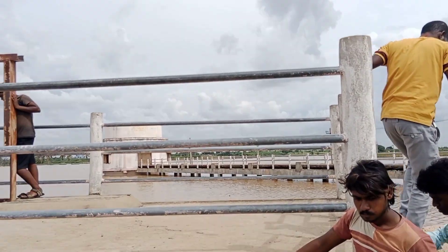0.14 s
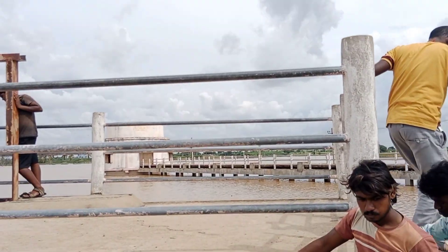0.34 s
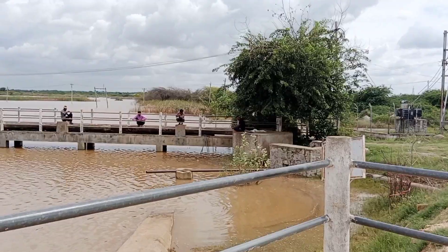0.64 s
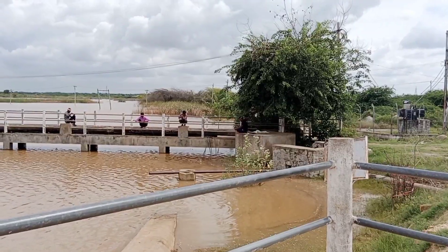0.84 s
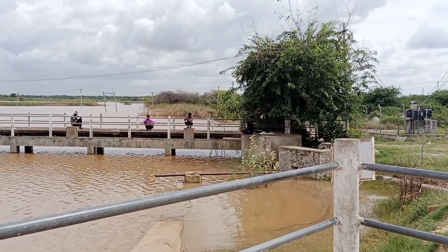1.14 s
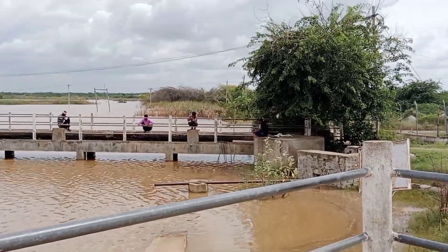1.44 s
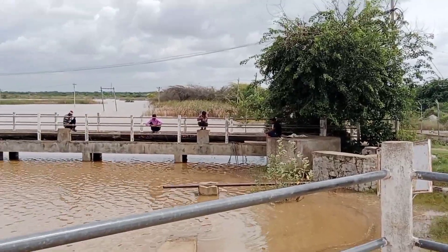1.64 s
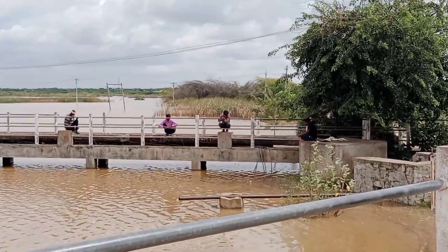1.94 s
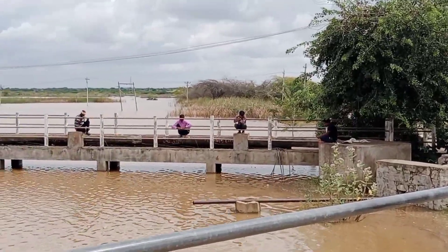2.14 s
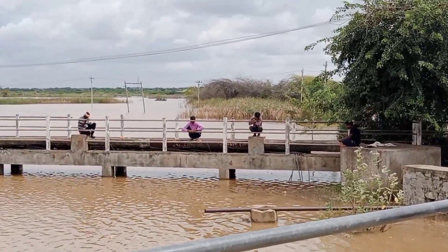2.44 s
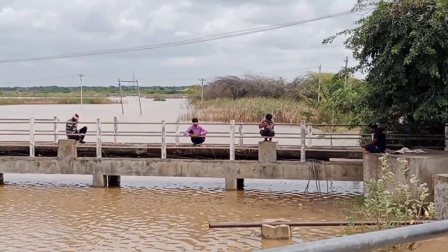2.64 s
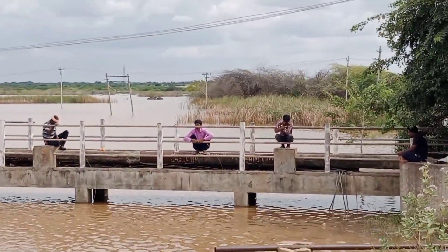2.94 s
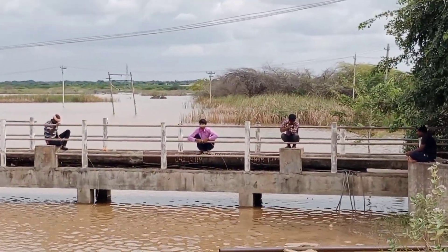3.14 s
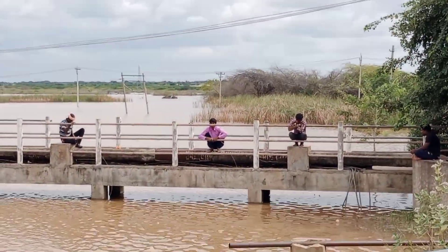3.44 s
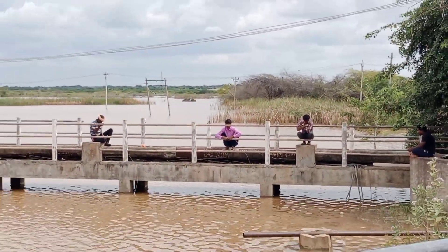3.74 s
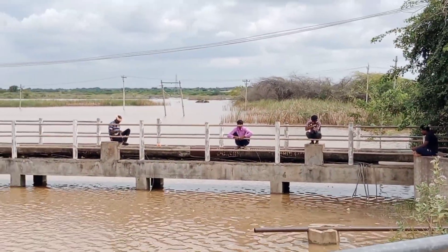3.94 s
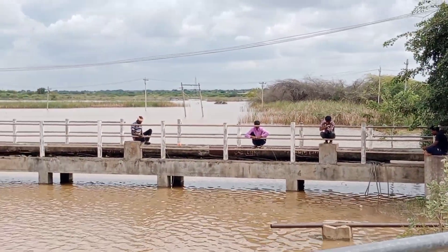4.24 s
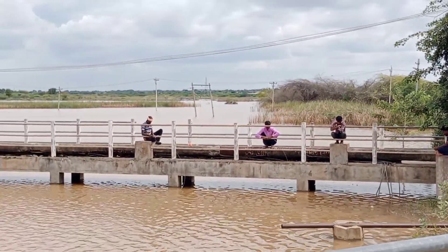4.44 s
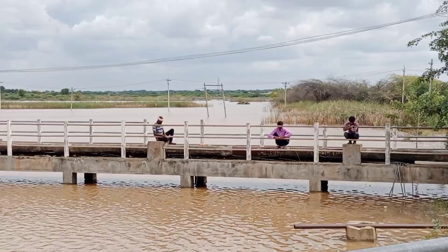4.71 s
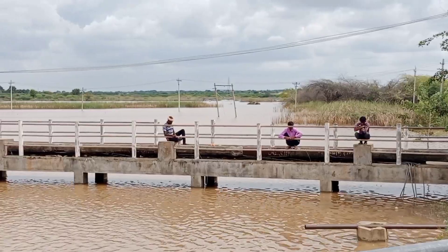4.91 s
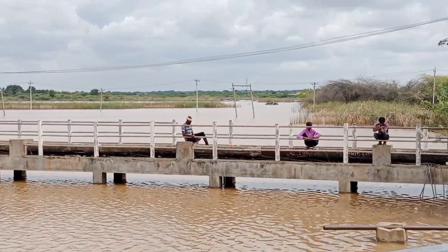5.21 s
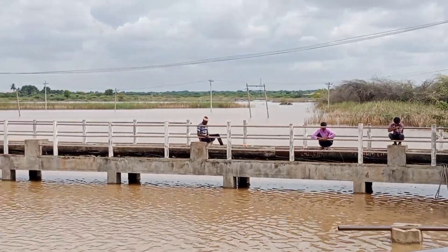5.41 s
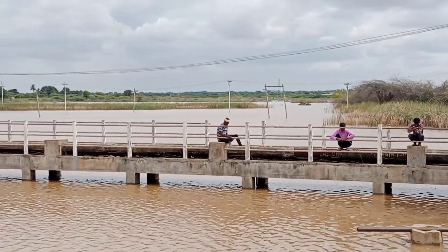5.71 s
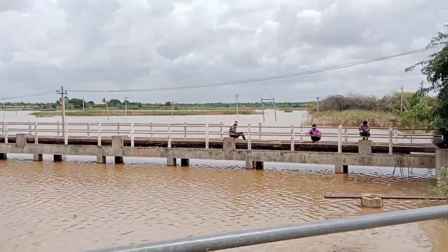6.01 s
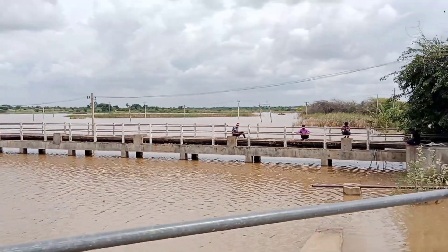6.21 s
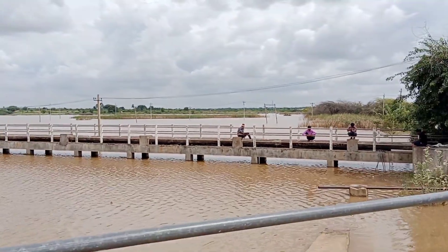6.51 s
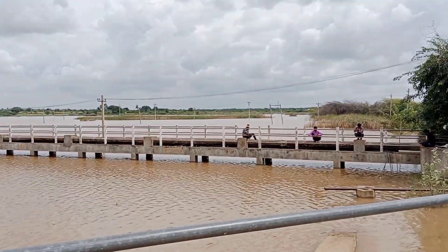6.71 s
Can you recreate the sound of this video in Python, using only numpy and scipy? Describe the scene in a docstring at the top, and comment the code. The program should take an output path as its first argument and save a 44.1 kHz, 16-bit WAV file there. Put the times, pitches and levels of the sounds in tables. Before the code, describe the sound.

A brief burst of close, bright falling water stops dead, and a more distant rush of water through sluices fades in.

```python
"""Floodwater pours through the sluices of a concrete causeway, heard by a phone outdoors.
First the falling water is near, loud and bright: broadband noise dotted with bursting bubbles.
At 0.39 s it is cut dead. After a brief silence a farther spot fades in: a low roar in the culverts,
where trapped air pockets ring, with a rumble, the rush of the stream and a thin hiss of spray.
To the end the flow swells and eases, and the mist and the hollow wash under the deck vary most with it."""
import sys
import numpy as np
from scipy import signal
from scipy.fft import rfft, irfft, next_fast_len
from scipy.io import wavfile
from scipy.ndimage import uniform_filter1d, map_coordinates

SR = 44100
rng = np.random.default_rng(int(sys.argv[2]) if len(sys.argv) > 2 else 0)


def generate_wav(sig):
    """Save sig (samples, or channels by samples) to the path in sys.argv[1] as 16-bit PCM at SR."""
    pcm = np.round(np.clip(np.atleast_2d(sig).T, -1, 1) * 32767).astype(np.int16)
    wavfile.write(sys.argv[1], SR, pcm)


N = 302526

# Noise spectrum of each source: frequency_hz, relative_density_db
MIST_SPECTRUM = [(8800, -11), (9300, 3), (15500, -5)]
HOLLOW_SPECTRUM = [(900, -15), (1250, 0), (1600, -1), (2100, -22)]
RUMBLE_SPECTRUM = [(12, -40), (25, -23), (40, -22), (58, -16), (83, -2.5), (120, 2), (170, -26.5)]
SPRAY_SPECTRUM = [(3500, -29), (5200, -1.5), (8800, 3), (9800, -6)]
ROAR_SPECTRUM = [(90, -32), (140, -1), (280, -0.5), (400, -2.5), (700, -26)]
RUSH_SPECTRUM = [(200, -17), (400, -1.5), (600, 0), (880, -3), (1300, -3.5), (2200, -7.5), (3200, -8.5),
                 (4500, -9), (6000, -34)]
FALL_SPECTRUM = [(12, -50), (25, -28), (48, -22), (80, -7.5), (170, 0), (450, 0.5), (950, -4), (2200, -2),
                 (3000, -6), (3500, -13.5), (4200, 9.5), (5400, 0), (7500, -1.5), (12500, 0), (15000, -4)]
# Slow envelopes of the far flow, the rumble and the near fall: time_s, level_db
FLOW_SWELL = [(.8, -1), (1.6, -0.4), (2.3, 0.64), (3.7, 0), (5, 0.73), (6.2, 1.36), (6.86, 0.5)]
RUMBLE_ENVELOPE = [(.8, -43), (1.2, -53), (1.6, -48), (1.9, -46), (2.4, -43.5), (2.7, -50), (3, -44.5),
                   (4.5, -46), (4.9, -44.5), (5.5, -41), (6.4, -47), (6.86, -46)]
FALL_ENVELOPE = [(0.0, -17), (0.312, -17.5), (0.368, -16), (0.39, -18)]
# Brief rises and dips in level: centre_s, change_db
MIST_GUSHES = [(1.26, 4), (4.4, 3)]
RUMBLE_THUMPS = [(1.78, 11), (1.9, 11), (4.83, 5), (5.41, 9), (6.81, 7)]
ROAR_LULLS = [(1.3, -4), (4.19, -7), (4.63, -4), (5.34, -6), (5.78, -4.5), (6.3, -5.5), (6.62, -6.5)]
# Response of the microphone's housing and port: frequency_hz, gain_db
HOUSING_RESPONSE = [(3200, 0.5), (3550, -6), (3980, -26), (4400, -34.5), (5300, -27.5), (5700, -20),
                    (6700, -8.5), (7500, -6), (8700, -14), (10000, -19), (12200, -19.5), (13100, -17),
                    (13700, -23), (15300, -19)]
# Cancellations in the port: centre_hz, width_hz, gain_db
PORT_NOTCHES = [(4840, 194, -23.5), (9320, 290, -12), (11400, 320, -6.5), (13900, 400, -2.5)]

CUT_S, FADE_IN_S = 0.3937, 0.4555
BAND_LIMIT_HZ = 15570


def amp(db):
    """Amplitude grows tenfold per 20 dB."""
    return 10 ** (np.asarray(db) / 20)


def rms(x):
    """Effective amplitude: the root of the mean power."""
    return np.sqrt(np.mean(x ** 2) + 1e-20)


def spectrum_db(points, hz):
    """Interpolation on a logarithmic frequency axis."""
    knots_hz, db = np.transpose(points)
    return np.interp(np.log(hz + 1), np.log(knots_hz + 1), db)


def envelope(points):
    """Linear interpolation of a level over time."""
    return np.interp(np.arange(N) / SR, *np.transpose(points))


def bumps(events, width_s):
    """Gaussian level changes in dB, down to 1/e at width_s from each centre."""
    return sum(db * np.exp(-((np.arange(N) / SR - s) / width_s) ** 2) for s, db in events)


def wobble(rate_hz):
    """Random modulation: a spline through rate_hz knots a second."""
    knots = rng.standard_normal(int(N * rate_hz / SR) + 4)
    return map_coordinates(knots, [np.arange(N) * rate_hz / SR])


def filtered(x, response):
    """Linear filtering multiplies the spectrum by a frequency response."""
    size = next_fast_len(N + 8192)
    return irfft(rfft(x, size) * response(np.fft.rfftfreq(size, 1 / SR)), size)[..., :N]


def microphone_gain(hz):
    """The housing colours the sound; destructive interference in the port notches it."""
    notches_db = sum(db * np.exp(-np.abs(hz - centre) / width) for centre, width, db in PORT_NOTCHES)
    return amp(spectrum_db(HOUSING_RESPONSE, hz) + notches_db)


def water_noise(spectrum, patchy_db, burst_db=-12, frame=512):
    """Patchy noise plus the shot noise of bursting bubbles, at unit rms after the microphone."""
    cells = signal.stft(rng.standard_normal(N), nperseg=frame)[2]
    patches = uniform_filter1d(rng.standard_normal(cells.shape), size=4, axis=0)
    patches = uniform_filter1d(patches, size=5, axis=1)
    noise = signal.istft(cells * amp(patchy_db * patches / rms(patches)), nperseg=frame)[1][:N]
    bursts = (rng.random(N) < 3000 / SR) * rng.standard_normal(N)  # about 3000 a second
    mix = noise / rms(noise) + amp(burst_db) * bursts / rms(bursts)
    water = filtered(mix, lambda hz: amp(spectrum_db(spectrum, hz)) * (hz > spectrum[0][0]))
    return water / rms(filtered(water, microphone_gain))


def mist(swell_db, surge):
    """Amplitude modulation makes the highest noise band flicker and flare."""
    level_db = -54 + 3 * swell_db + 0.4 * surge + bumps(MIST_GUSHES, 0.07) + 0.71 * wobble(18)
    return amp(level_db) * water_noise(MIST_SPECTRUM, patchy_db=2.5)


def hollow_wash(swell_db, surge):
    """The air under the deck acts as a band-pass filter on the water's noise."""
    level_db = -44.5 + 5.5 * swell_db + 0.4 * surge
    return amp(level_db) * water_noise(HOLLOW_SPECTRUM, patchy_db=1.5, frame=1024)


def rumble():
    """Low-frequency noise, whose brief envelope peaks are heard as thumps."""
    level_db = envelope(RUMBLE_ENVELOPE) + bumps(RUMBLE_THUMPS, 0.028) + 2.5 * wobble(14)
    return amp(level_db) * water_noise(RUMBLE_SPECTRUM, patchy_db=2, burst_db=-14, frame=2048)


def spray(swell_db, surge):
    """Spray radiates high-frequency noise, heard as a thin hiss."""
    return amp(-41.5 + 0.75 * swell_db + 0.3 * surge) * water_noise(SPRAY_SPECTRUM, patchy_db=1)


def air_pockets(count, median_hz, log_spread, cycles):
    """Air pockets swallowed by the flow ring as damped oscillators of rising pitch."""
    when, depth = np.hsplit(rng.random((count, 2)), 2)
    t = np.arange(4000) / SR
    pitch_hz = median_hz * np.exp(log_spread * rng.standard_normal((count, 1)))
    age = pitch_hz * t / cycles
    phase = 2 * np.pi * pitch_hz * t * (1 + 0.064 * age)
    rings = amp(-12 * depth) * age * np.exp(-2 * age) * np.sin(phase)
    samples = (when * N).astype(int) + np.arange(len(t))
    gulps = np.bincount(samples.ravel(), rings.ravel())[:N]
    return gulps / rms(gulps)


def culvert_roar(swell_db, surge):
    """Low noise and bubble resonances superpose in a roar with brief lulls."""
    churn = water_noise(ROAR_SPECTRUM, patchy_db=2.5, burst_db=-16.5, frame=2048)
    churn += amp(-8.5) * air_pockets(count=600, median_hz=281.3, log_spread=0.401, cycles=6.25)
    level_db = -33.5 + 0.2 * swell_db + 0.29 * surge + bumps(ROAR_LULLS, 0.042) + 1.6 * wobble(25)
    return amp(level_db) * churn / rms(churn)


def stream_rush(swell_db, surge):
    """The stream radiates broad midrange noise that grows with the flow."""
    level_db = -29.5 + 0.64 * swell_db + 0.32 * surge
    return amp(level_db) * water_noise(RUSH_SPECTRUM, patchy_db=1.23, frame=1024)


def far_sluices(fade):
    """Common modulation: all but the rumble swell and surge together. The treble fades in last."""
    flow = envelope(FLOW_SWELL), wobble(12)
    bass = fade ** 1.13 * (rumble() + culvert_roar(*flow))
    midrange = fade ** 1.17 * (stream_rush(*flow) + hollow_wash(*flow))
    treble = fade ** 1.2 * spray(*flow) + fade ** 1.3 * mist(*flow)
    return bass + midrange + treble


def near_fall():
    """The impact of a sheet of water close by radiates broadband noise."""
    level_db = envelope(FALL_ENVELOPE) + 0.35 * wobble(18.7)
    return amp(level_db) * water_noise(FALL_SPECTRUM, patchy_db=1.6, burst_db=-11)


def scene():
    """A fast gate cuts off the near spot; the far spot approaches full level exponentially."""
    t = np.arange(N) / SR
    cut_db = np.interp(t - CUT_S, [0, .0004, .006, .014, .03], [0, -24, -30, -60, -120])
    fade = 1 - np.exp(-np.clip(t - FADE_IN_S, 0, None) / 0.14)
    return (near_fall() * amp(cut_db) + far_sluices(fade))[None]


def record(dry):
    """Filters in cascade: the microphone's response, then a steep low-pass."""
    coloured = filtered(dry, microphone_gain)
    return filtered(coloured, lambda hz: np.clip((BAND_LIMIT_HZ - hz) / 120, 0, 1))


dry = scene()
out = record(dry)
generate_wav(out)
```